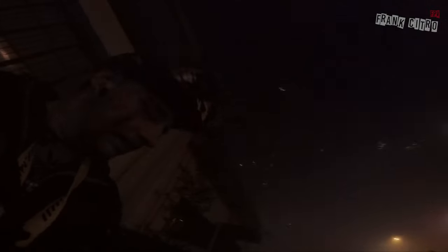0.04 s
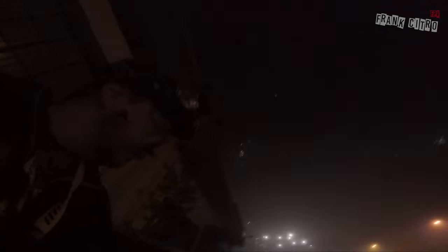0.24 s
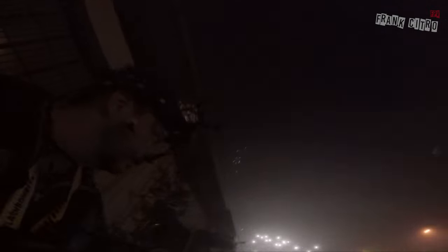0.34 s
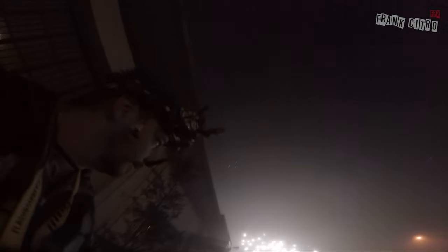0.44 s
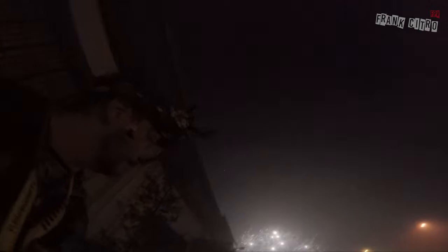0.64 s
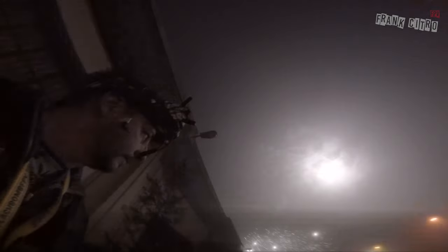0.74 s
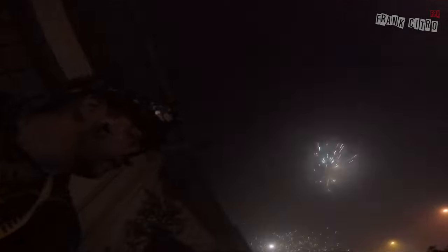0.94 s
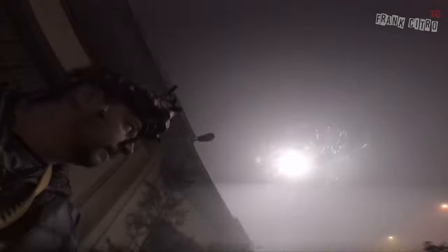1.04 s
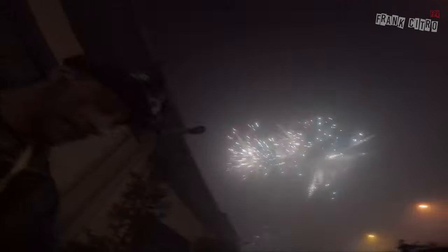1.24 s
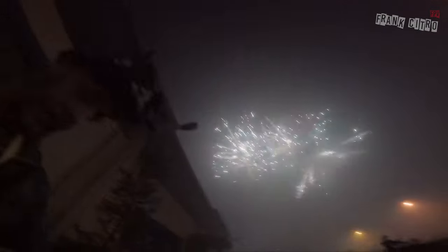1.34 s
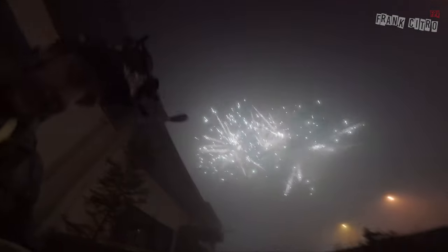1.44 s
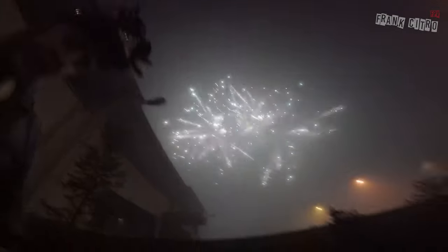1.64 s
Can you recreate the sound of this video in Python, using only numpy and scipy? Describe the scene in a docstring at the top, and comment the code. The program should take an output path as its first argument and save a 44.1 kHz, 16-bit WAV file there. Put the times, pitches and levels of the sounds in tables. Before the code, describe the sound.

Aerial fireworks close by outdoors: a low rumble and faint distant crackle, then snapping stars swell to a dense sizzle, followed by a big boom and a quick cluster of four more, overloading the microphone.

```python
"""A low rumble and a faint far crackle open the night; aerial fireworks then go off close by.
Crackling stars pop, thicken to a dense sizzle and thin out: impulses shaped into tiny pressure waves.
Five shell bursts follow, two of them led in by a soft low swell; each is a boom with a sharp crack.
Ground and houses return the booms as discrete reflections, a diffuse roll and a late hollow echo.
The highest peaks overload the microphone."""
import sys
import numpy as np
from scipy import signal
from scipy.fft import rfft, irfft, next_fast_len
from scipy.io import wavfile
from scipy.ndimage import uniform_filter1d, map_coordinates

SR = 44100
rng = np.random.default_rng(int(sys.argv[2]) if len(sys.argv) > 2 else 0)


def transcribe(u):
    """Save the signal u as a 16-bit wav file named by the first command-line argument.

    u: samples, shape (n,) or (channels, n), limited to [-1, 1]; the rate is SR.
    q: integer samples, one column per channel.
    """
    v = np.clip(np.atleast_2d(u).T, -1, 1)
    q = np.round(v * 32767).astype(np.int16)
    wavfile.write(sys.argv[1], SR, q)


N = 74970

# Low rumble: (time [s], level [dB])
RUMBLE_LEVEL = [(0, -29.5), (.08, -34.5), (.16, -32), (.2, -27), (.35, -30), (.68, -31), (.85, -45),
                (1.2, -32.5), (1.7, -39)]
# Spectrum of the rumble: (frequency [Hz], level [dB])
RUMBLE_SPECTRUM = [(20, -14.5), (40, -3), (100, -3.5), (170, 1.5), (300, -5.5), (500, -9.5), (1000, -27),
                   (4000, -57)]
RUMBLE_WAVER_DB = 1.8

# Far crackle: (time [s], level [dB], gain of its treble [dB])
FAR_LEVEL = [(0, -33, -5.5), (.15, -40.5, -7.5), (.35, -38, 3), (.95, -30, -7.5), (1.3, -33.5, -4.5),
             (1.52, -38, 0), (1.62, -35.5, 2.5), (1.7, -34.5, 2.5)]
# Spectrum of the far crackle: (frequency [Hz], level [dB])
FAR_SPECTRUM = [(100, -1), (200, -10.5), (550, 6), (800, 0), (1500, 2), (3000, -4.5), (4400, -12.5),
                (5700, -0.5), (6700, -5.5), (8500, -18), (10800, -26.5), (12000, -45), (15000, -42)]

# Low swells just before a burst: (time [s], relative level [dB])
SWELLS = [(0.921, -18.5), (1.159, -20)]
# Spectrum of a swell: (frequency [Hz], level [dB])
SWELL_SPECTRUM = [(30, -18), (100, -11), (150, 7), (280, -16.5), (500, 0), (1500, -26), (6000, -63)]
SWELL_DB, SWELL_ECHO_DB = 20.5, -7

# Cloud of stars: (time [s], rate [pops/s], relative level of a pop [dB])
CLOUD = [(.38, 23.8, -25), (.452, 49.2, -5), (.458, 550, -14), (.49, 650, -12), (.54, 1100, -13),
         (.575, 850, -16), (.6, 1010, -14), (.66, 1000, -13), (.72, 700, -16), (.742, 720, -12),
         (.77, 416, -16.5), (.9, 327, -23), (.93, 182, -22)]
CLOUD_DB, CLOUD_SCATTER_DB = 12, 4
CLUMP_DB, CLUMP_KNOTS_PER_S = 1.9, 120

# Single stars that stand out: (time [s], relative level [dB])
POPS = [(0.1752, -12), (0.183, -18), (0.2431, -5.5), (0.2454, -2.5), (0.2512, -13), (0.2574, -5.5),
        (.2595, -4), (0.3011, -4), (0.3437, -10.5), (0.3661, -1), (.3750, -4), (0.3777, -2), (0.3867, -2.5),
        (0.3902, -9), (0.3924, -1.5), (0.3992, -0.5), (0.4061, -1.5), (0.4095, -3.5), (0.4187, -1.5),
        (.4238, -6.5), (0.4319, -17), (0.4302, -1.5), (0.4337, 0), (0.441, -1.5), (0.4615, -6),
        (0.4656, -11), (0.4768, -24), (0.4835, -12), (0.5048, -2.5), (0.513, 0.5), (0.5307, -2),
        (0.5481, -4), (0.5843, -7), (.6027, 0), (0.6216, -1), (0.6644, -10), (0.6812, -20), (0.7672, -7.5),
        (0.7796, 0.5), (0.7873, -5.5), (0.7954, -11), (.8010, -6.5), (0.8042, -0.5), (0.8144, -1),
        (0.8225, -3.5), (.8260, -1.5), (0.8462, -3.5), (0.8553, -2), (0.8632, -9), (0.8791, -2.5),
        (0.8925, -5), (.8992, -1), (0.902, -1.5), (1.059, -14), (1.0960, -5.5), (1.1535, -4)]
# Spectrum of a pop: (frequency [Hz], level [dB])
POP_SPECTRUM = [(40, -12), (110, -19), (170, 2), (400, -2.5), (700, 0.5), (1500, 1), (3000, -4),
                (4400, -14), (5300, -3), (6100, -2.5), (7000, -6.5), (8500, -18), (10800, -25),
                (11900, -40), (13500, -32), (16000, -51)]
# Treble of the single pops over their body: (time [s], level [dB])
POP_TREBLE = [(.18, -9.5), (.245, 3), (.3, 9.5), (.37, 1.5), (.9, -1.5), (1.1, -0.5)]
POP_DB, POP_TREBLE_HZ, POP_SWEEP_HZ = 5.5, 3500, 1900
# Spectrum of the pops' echo: (frequency [Hz], level [dB])
POP_ECHO_SPECTRUM = [(40, -5), (110, -16), (170, 6.5), (300, 7), (500, -2.5), (1500, -1), (6000, -1),
                     (14000, -9)]
POP_ECHO_DB, POP_ECHO_RISE_S = -4, 0.0014
# Brief scatter from things close by
NEAR_DB, NEAR_T60_S = -7, .012

# Shell bursts: (time [s], relative boom level [dB], relative crack level [dB], relative echo level [dB])
BURSTS = [(.9366, 3, 3.5, 1.5), (1.1711, 1.5, 4.5, 1), (1.1913, -1.5, -2.5, 0.5), (1.2250, 0, -2, -3.5),
          (1.2477, -1, -0.5, -5.5)]
# Spectrum of a boom: (frequency [Hz], level [dB])
BOOM_SPECTRUM = [(30, -43), (80, -9), (110, -7), (150, 6), (220, -1.5), (340, 1), (550, -4), (1000, -17.5),
                 (2000, -25), (4000, -36), (12000, -75.5)]
# Spectrum of its sharp crack: (frequency [Hz], level [dB])
CRACK_SPECTRUM = [(100, -18), (500, 17), (1000, 13), (2000, 0), (3000, -0.5), (4400, -6.5), (5700, 6.5),
                  (6600, -1.5), (8500, -10.5), (12000, -25), (15000, -65)]
BOOM_DB, CRACK_DB, BOOM_SWEEP_HZ = 18, 10, 200
BOOM_RING_HZ, BOOM_RING_WIDTH_HZ = 146, 300

# Reflection from the ground
GROUND_S, GROUND_DB = .0062, -12.5
# Reflections from the houses: (delay [s], level [dB])
WALLS = [(0.0213, -24), (.0335, -19), (.056, -27.5), (.076, -36), (0.123, -45), (.19, -19)]
# Decay of the street's diffuse echo: (frequency [Hz], 60 dB decay time [s])
STREET_DECAY = [(100, 0.28), (200, 0.64), (330, 0.66), (520, 0.78), (900, 0.58), (6000, 0.3), (14000, 0.78)]
# Spectrum of the rolling echo: (frequency [Hz], level [dB])
ROLL_SPECTRUM = [(30, -37), (90, -18), (150, -4), (230, 2.5), (350, -3), (550, -5.5), (800, -7.5),
                 (1500, -13), (3000, -37), (6000, -22.5), (14000, -6)]
ROLL_DB, ROLL_RISE_S, ROLL_HOLD_S = 1.5, 0.004, 0.096
# Late, hollow echo from a far row of houses: (frequency [Hz], level [dB])
LATE_SPECTRUM = [(100, -21), (250, -11), (430, 1), (600, 1), (900, -5), (2000, 0), (6000, -20.5)]
LATE_S, LATE_DB, LATE_RISE_S = 0.17, -11.5, 0.013

# Treble response of the microphone: (frequency [Hz], gain [dB])
MIC_RESPONSE = [(10000, 0), (13500, -1), (14800, -5), (16000, -18)]
CLIP_TOP, CLIP_HARDNESS, TOP_HZ = 1.03, 6, 16200


def amp(db):
    """Definition of the decibel: amplitude ratio of a level."""
    return 10 ** (np.asarray(db) / 20)


def unit(x):
    """Normalization to unit root-mean-square."""
    return x / np.sqrt(np.mean(x ** 2) + 1e-20)


def along(points, hz):
    """Interpolation of (Hz, value) points along a logarithmic frequency axis."""
    f, v = np.transpose(points)
    return np.interp(np.log(hz + 1), np.log(f + 1), v)


def curves(rows):
    """Linear interpolation in time: one value per sample for each column after the time."""
    s, *cols = np.transpose(rows)
    return [np.interp(np.arange(N) / SR, s, c) for c in cols]


def wobble(rate):
    """Spline interpolation of noise: a smooth random curve with rate knots a second."""
    knots = rng.standard_normal(1000)
    return map_coordinates(knots, [np.arange(N) * rate / SR], mode="mirror")


def filtered(x, response):
    """Convolution theorem: the spectrum of x times a complex response of frequency."""
    m = 2 * next_fast_len(N * 3 // 5, real=True)
    hz = np.fft.rfftfreq(m, 1 / SR)
    return irfft(rfft(x, m) * response(hz), m)[:N]


def causal(points, hz):
    """Minimum phase: folding the cepstrum makes a response of the given spectrum causal."""
    cepstrum = irfft(np.log(amp(along(points, hz))))
    half = len(cepstrum) // 2
    cepstrum[1:half] *= 2
    cepstrum[half + 1:] = 0
    return np.exp(rfft(cepstrum))


def impulses(s, gain):
    """Superposition of unit-sample impulses at times s, each with its gain."""
    at = np.clip(np.round(np.asarray(s) * SR).astype(int), 0, N)
    return np.bincount(at, gain, N + 1)[:N]


def blast(x, tone, sweep_hz):
    """All-pass dispersion: each impulse becomes a wave of equal energy whose lows trail its front."""
    def response(hz):
        h = causal(tone, hz)
        same_energy = h / np.sqrt(np.mean(abs(h) ** 2))
        return same_energy * (1j * hz - sweep_hz) / (1j * hz + sweep_hz)
    return filtered(x, response)


def swing(hz):
    """Second-order all-pass: group delay is greatest around the wave's slowest swing."""
    d = BOOM_RING_HZ ** 2 - hz ** 2 + 1j * hz * BOOM_RING_WIDTH_HZ
    return np.conj(d) / d


def scattered(s, db, size=700):
    """Multiple scattering: each pop's impulse gains its own short decaying noise tail."""
    t = np.arange(size) / SR
    tails = rng.standard_normal((len(s), size)) * amp(-60 * t / NEAR_T60_S)
    tails *= amp(NEAR_DB) / np.linalg.norm(tails, axis=1, keepdims=True)
    tails[:, 0] = 1  # direct sound
    times = s[:, None] + t
    gains = amp(db)[:, None] * tails
    return impulses(times.ravel(), gains.ravel())


def street(x, tone, rise_s, hold_s=0):
    """Diffuse reverberation: fresh noise builds up, holds, then decays at a rate set by frequency."""
    hz, t, z = signal.stft(rng.standard_normal(SR), SR, nperseg=256)
    fade = amp(-60 * np.maximum(t - hold_s, 0) / along(STREET_DECAY, hz)[:, None])
    tail = signal.istft(z * fade, SR)[1]
    tail = tail * (1 - np.exp(-np.arange(len(tail)) / SR / rise_s))
    wet = signal.fftconvolve(x, tail / np.linalg.norm(tail))[:N]
    return filtered(wet, lambda f: causal(tone, f))


def rumble():
    """Filtered noise of wavering level: the low roll of earlier bursts."""
    db, = curves(RUMBLE_LEVEL)
    noise = rng.standard_normal(N)
    roll = unit(filtered(noise, lambda hz: amp(along(RUMBLE_SPECTRUM, hz))))
    return amp(db + RUMBLE_WAVER_DB * wobble(30.56)) * roll


def far_crackle():
    """Impulsive noise of widely scattered grain levels: distant stars blurred to a grainy hiss."""
    db, treble_db = curves(FAR_LEVEL)
    grains = rng.standard_normal(N) * amp(6.5 * rng.standard_normal(N))
    hiss = unit(filtered(grains, lambda hz: causal(FAR_SPECTRUM, hz)))
    treble = filtered(hiss, lambda hz: hz > 4300)
    return amp(db) * (hiss + (amp(treble_db) - 1) * treble)


def swells():
    """Filtered impulses: dull low swells lead into two bursts, with a diffuse echo."""
    s, db = np.transpose(SWELLS)
    lows = blast(impulses(s, amp(db + SWELL_DB)), SWELL_SPECTRUM, BOOM_SWEEP_HZ)
    return lows + amp(SWELL_ECHO_DB) * street(lows, ROLL_SPECTRUM, ROLL_RISE_S)


def cloud(count=900):
    """Point process: random pops follow the cloud's rate while a random curve clumps their levels."""
    rate, db = curves(CLOUD)
    db = db + CLUMP_DB * np.clip(wobble(CLUMP_KNOTS_PER_S), -2, 1)
    t = np.arange(N) / SR
    burning = (t > CLOUD[0][0]) * (t < CLOUD[-1][0])
    total = np.cumsum(abs(rate) * burning) / SR  # expected pops so far
    turn = np.arange(count) + rng.uniform(-1, 1, count)
    size_db = CLOUD_SCATTER_DB * np.clip(rng.standard_normal(count), -2, 1)
    live = (turn > 0) & (turn < total[-1])
    s = np.interp(turn, total, t)
    pop_db = CLOUD_DB + np.interp(s, t, db) + size_db
    return scattered(s, np.where(live, pop_db, -np.inf))


def crackle(count=4):
    """Superposed small blasts: single stars and cloud pop, and reverberate in interleaved groups."""
    s, db = np.transpose(POPS)
    treble_db, = curves(POP_TREBLE)
    single = scattered(s, db + POP_DB)
    treble = filtered(single, lambda hz: hz ** 4 / (hz ** 4 + POP_TREBLE_HZ ** 4))
    body = single - treble
    single = amp(-treble_db / 2) * body + amp(treble_db / 2) * treble
    pops = blast(single + cloud(), POP_SPECTRUM, POP_SWEEP_HZ)
    # successive 300-sample slices take turns among the echoes, with blurred edges
    groups = np.arange(N) // 300 % count
    wash = np.zeros(N)
    for k in range(count):
        share = uniform_filter1d((groups == k) * 1., size=40)
        wash += street(pops * share, POP_ECHO_SPECTRUM, POP_ECHO_RISE_S)
    return pops + amp(POP_ECHO_DB) * wash


def shells():
    """Blast and reflection: boom and crack, then ground, walls, a rolling echo and a late one."""
    out = np.zeros(N)
    delay, wall_db = np.transpose(WALLS)
    for s, db, crack_db, echo_db in BURSTS:
        boom = blast(impulses([s], [amp(db + BOOM_DB)]), BOOM_SPECTRUM, BOOM_SWEEP_HZ)
        crack = blast(impulses([s], [amp(crack_db + CRACK_DB)]), CRACK_SPECTRUM, BOOM_SWEEP_HZ)
        wave = filtered(boom + crack, swing)
        # wall delays vary a little from burst to burst
        walls = impulses(delay + rng.normal(0, 0.00103, len(delay)), amp(wall_db))
        paths = walls + impulses([GROUND_S], [amp(GROUND_DB)])
        reflected = signal.fftconvolve(wave, paths)[:N]
        echoes = filtered(reflected, lambda hz: 1 / (1 + 1j * hz / 2500))  # duller than the wave
        roll = street(wave, ROLL_SPECTRUM, ROLL_RISE_S, ROLL_HOLD_S)
        out += wave + echoes + amp(ROLL_DB + echo_db) * roll
        late = np.interp(np.arange(N) - LATE_S * SR, np.arange(N), wave, left=0)
        out += amp(LATE_DB) * street(late, LATE_SPECTRUM, LATE_RISE_S)
    return out


def scene():
    """Linear superposition of all sources at one microphone."""
    return (rumble() + far_crackle() + swells() + crackle() + shells())[None]


def record(dry):
    """Saturation, then band limiting: the microphone flattens high peaks and dulls the top."""
    x = dry[0] / (1 + abs(dry[0] / CLIP_TOP) ** CLIP_HARDNESS) ** (1 / CLIP_HARDNESS)
    return filtered(x, lambda hz: amp(along(MIC_RESPONSE, hz)) * (hz < TOP_HZ))[None]


dry = scene()
out = record(dry)
transcribe(out)
```